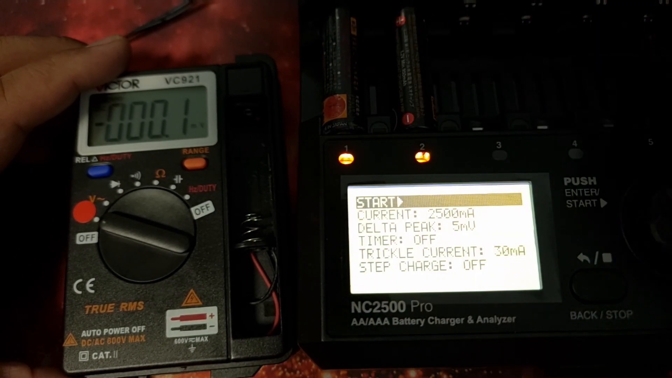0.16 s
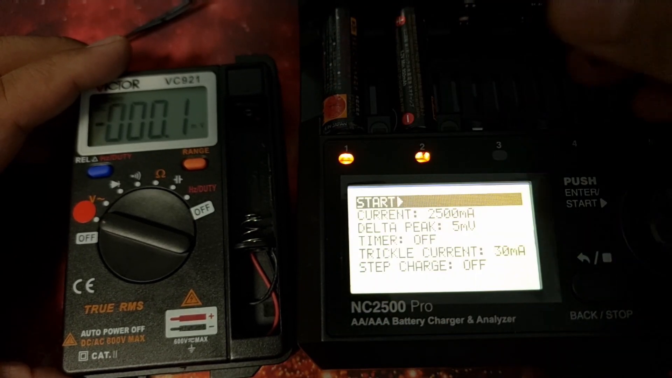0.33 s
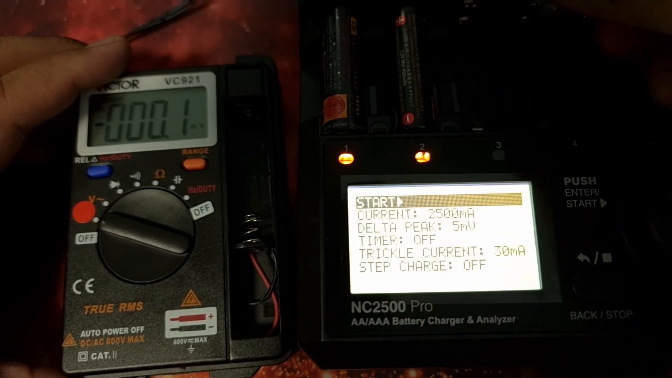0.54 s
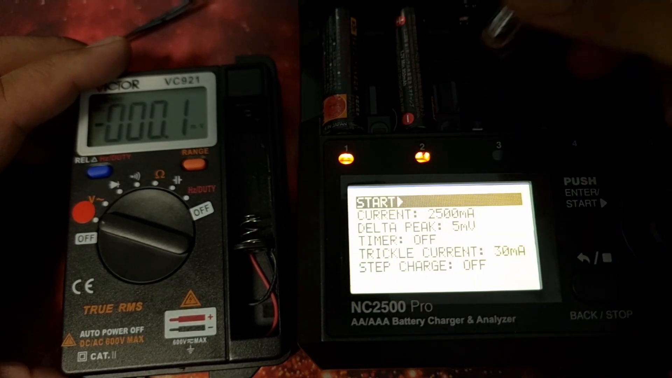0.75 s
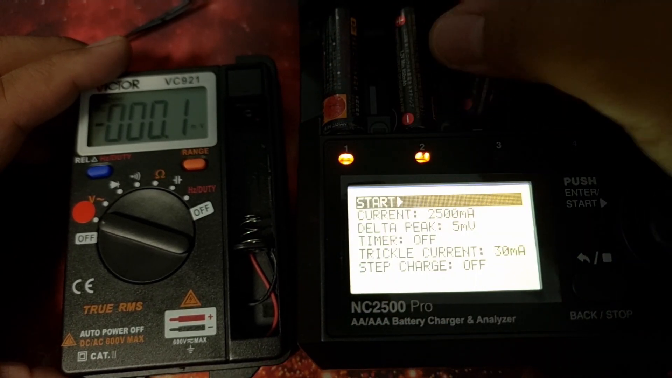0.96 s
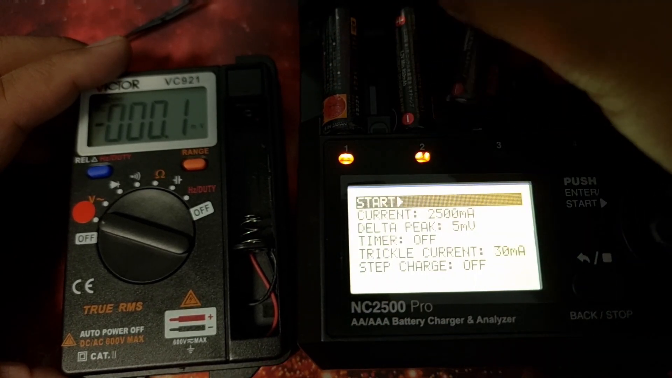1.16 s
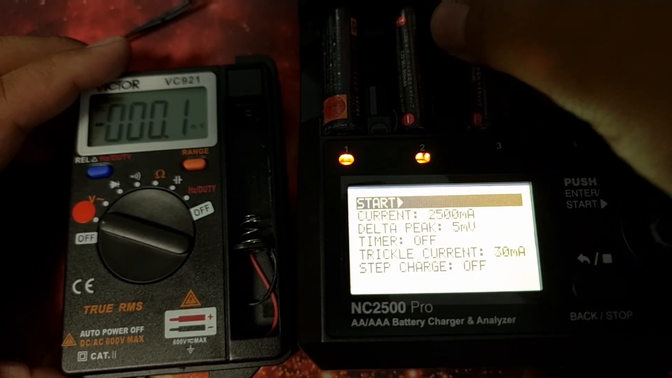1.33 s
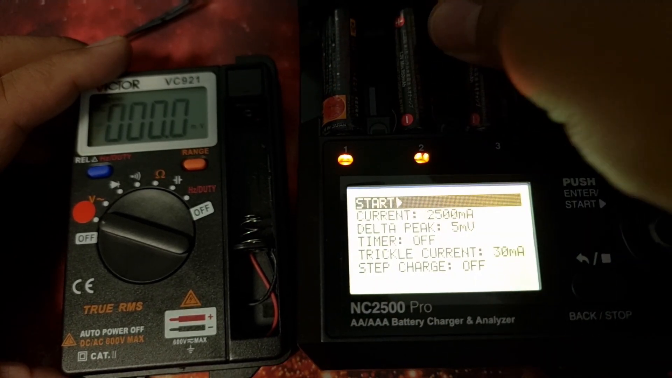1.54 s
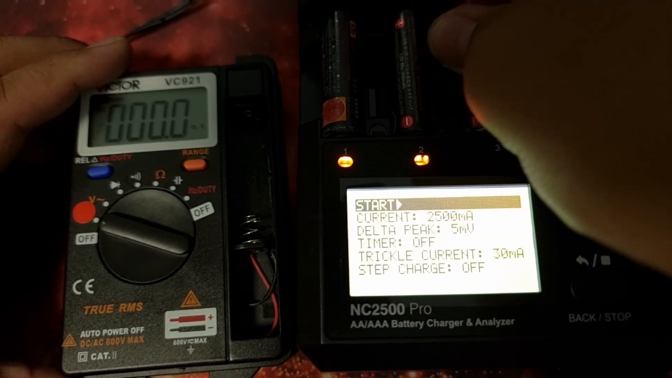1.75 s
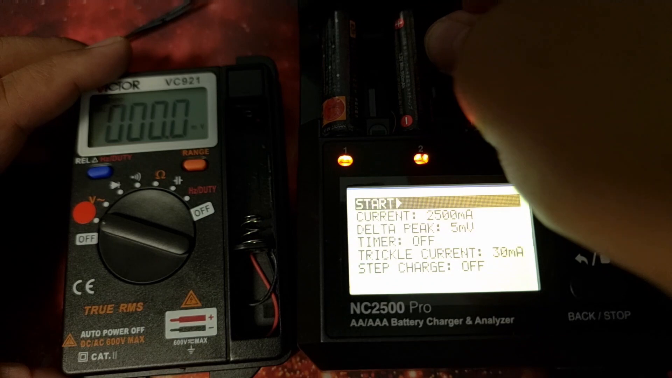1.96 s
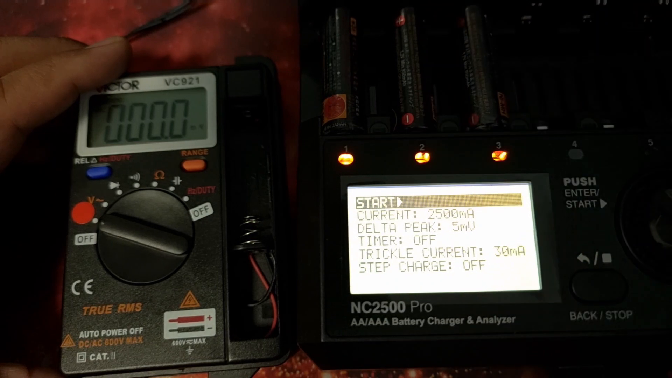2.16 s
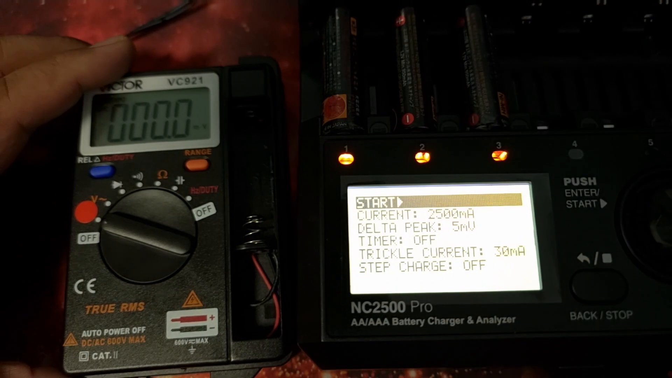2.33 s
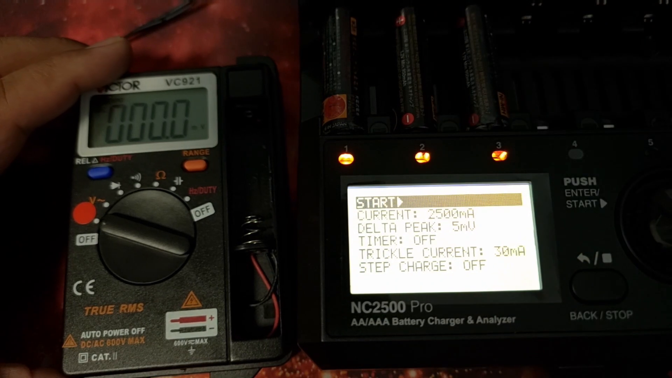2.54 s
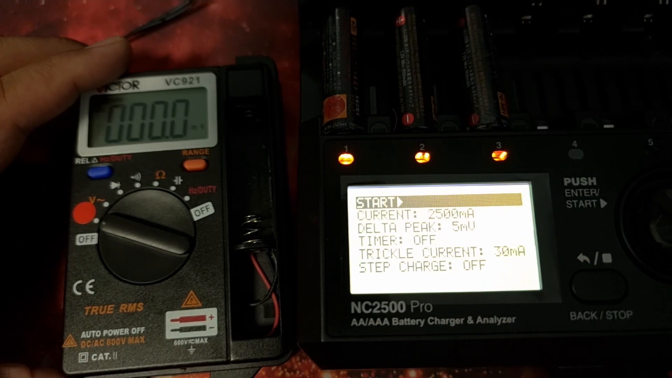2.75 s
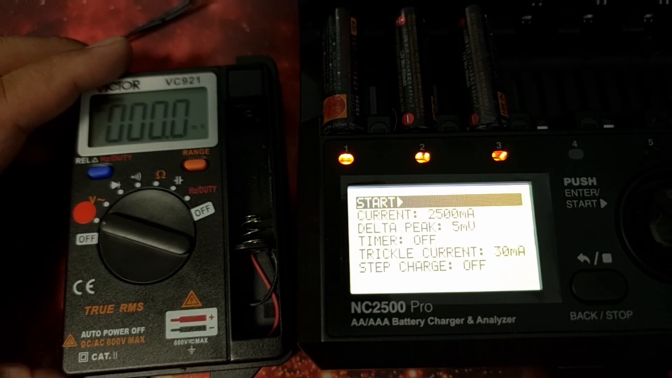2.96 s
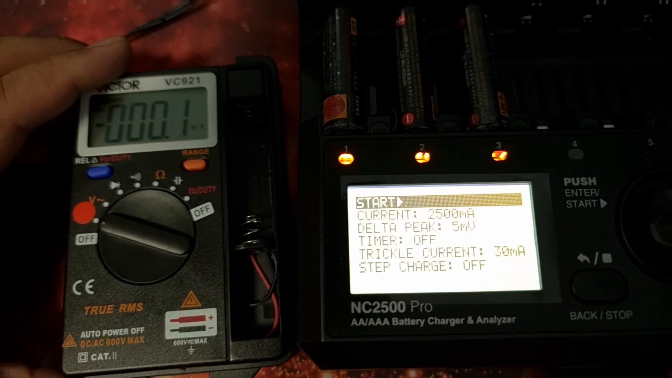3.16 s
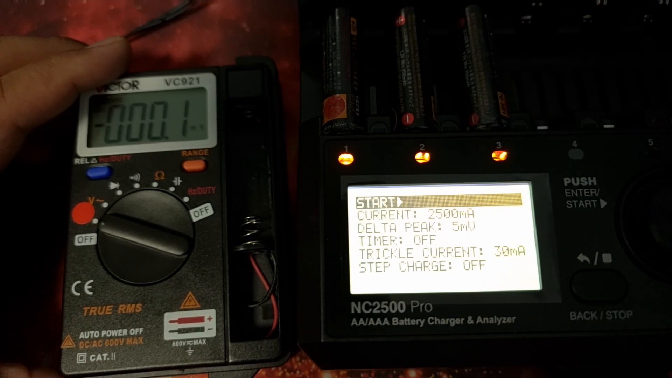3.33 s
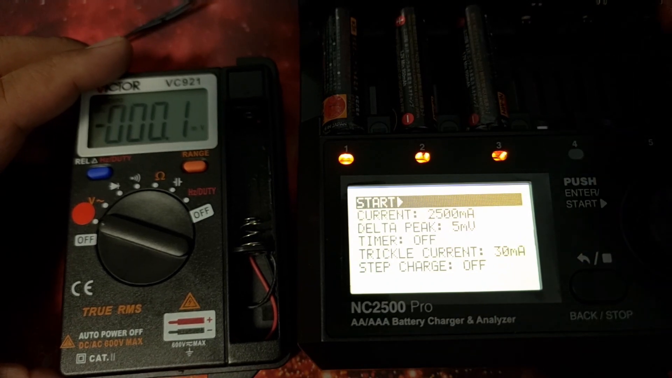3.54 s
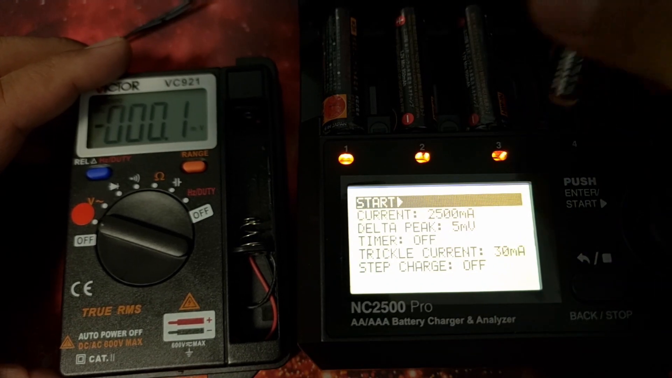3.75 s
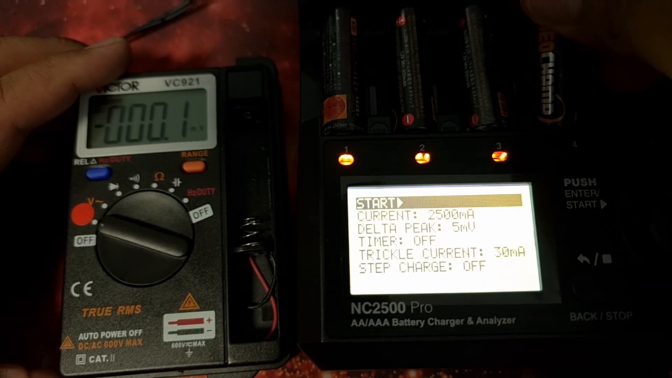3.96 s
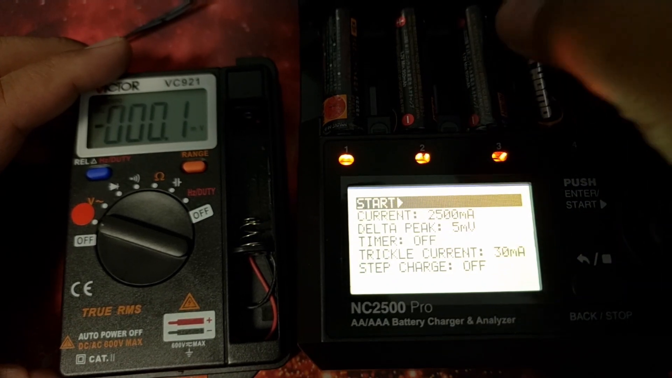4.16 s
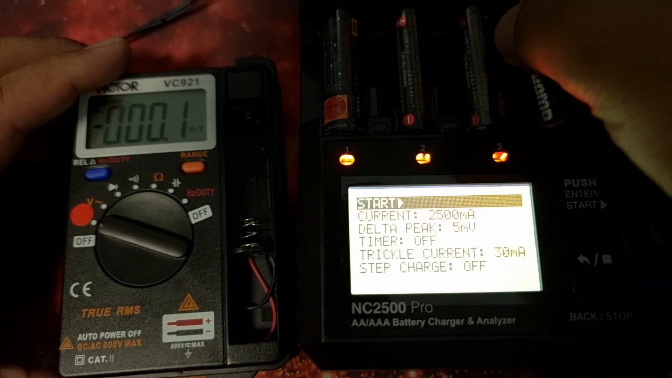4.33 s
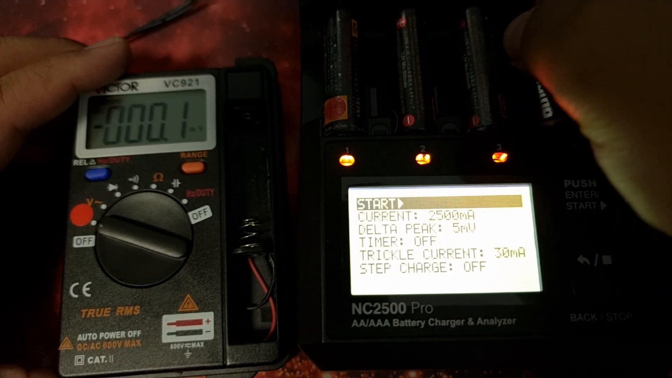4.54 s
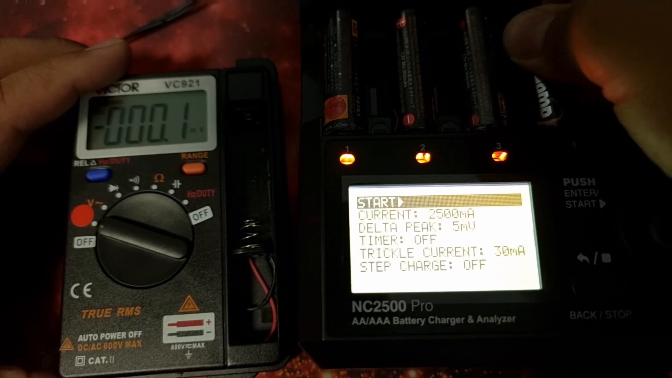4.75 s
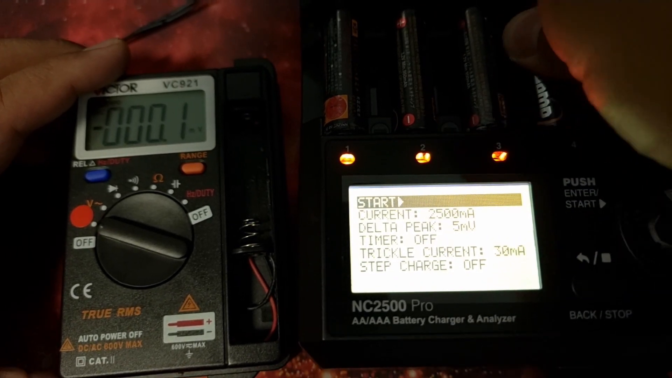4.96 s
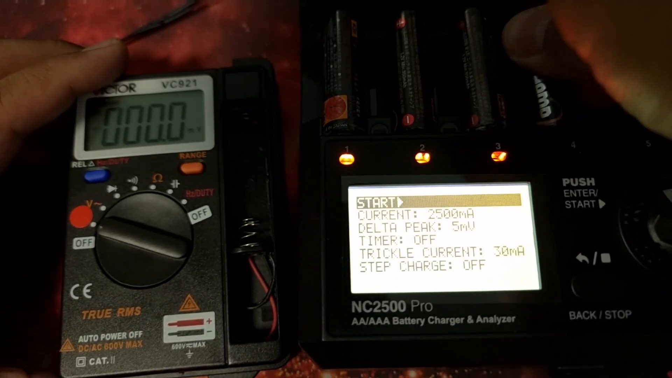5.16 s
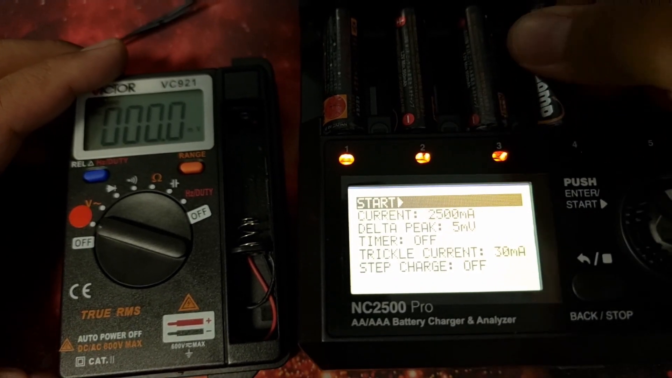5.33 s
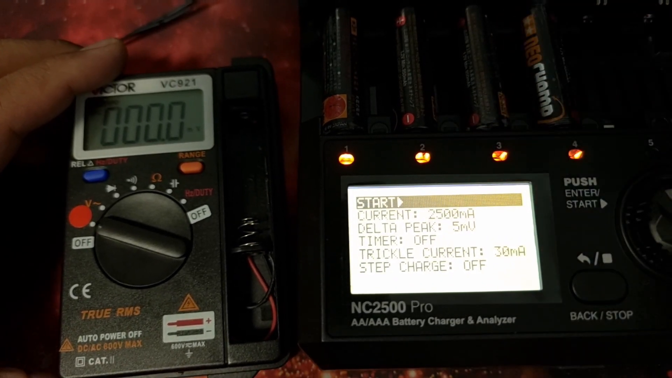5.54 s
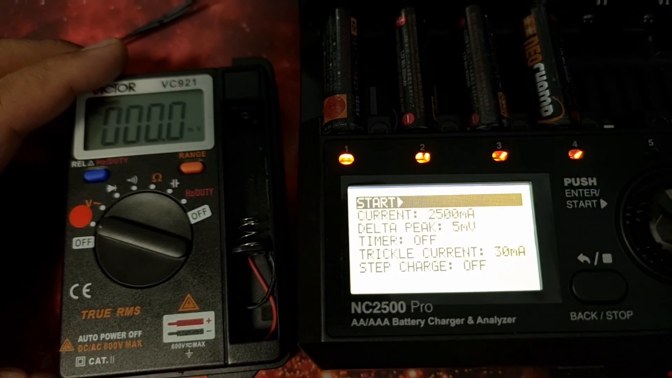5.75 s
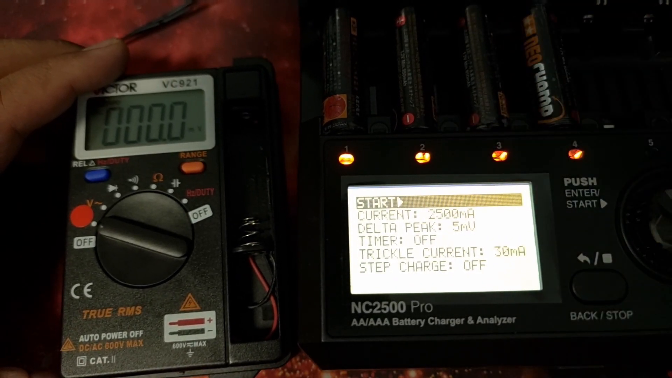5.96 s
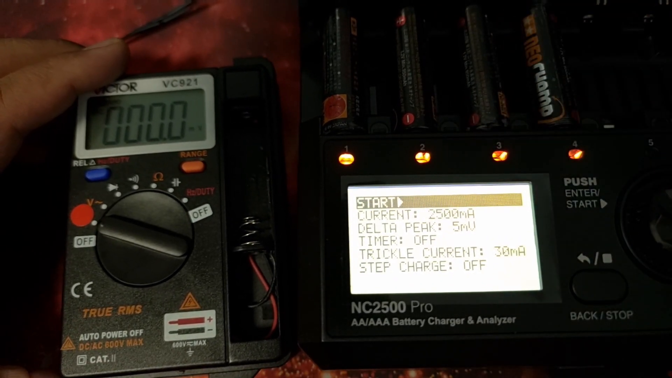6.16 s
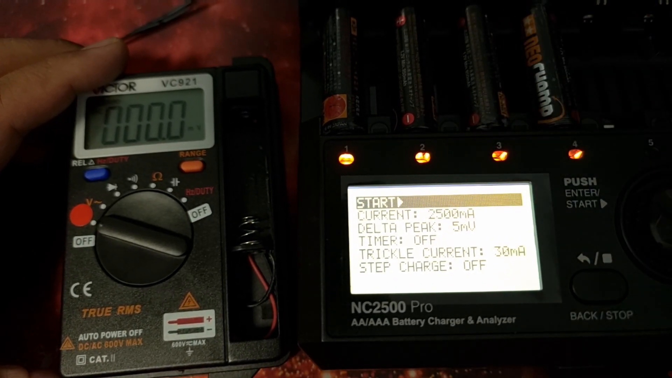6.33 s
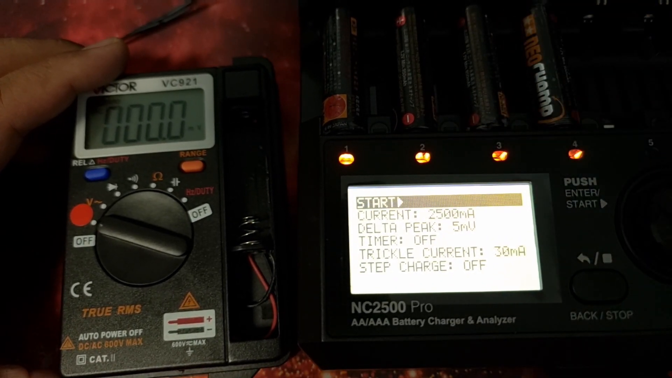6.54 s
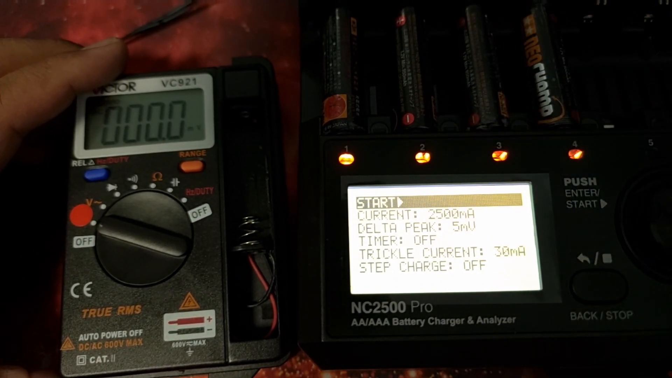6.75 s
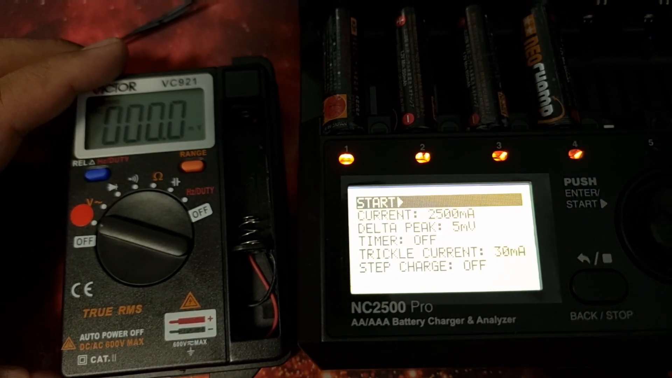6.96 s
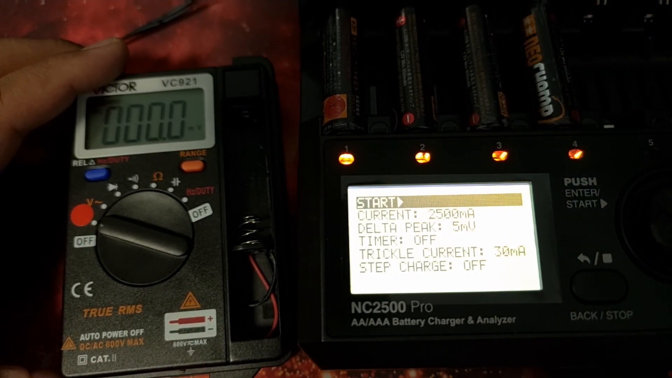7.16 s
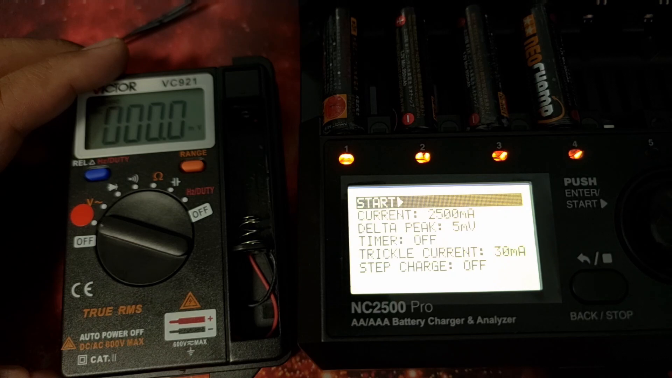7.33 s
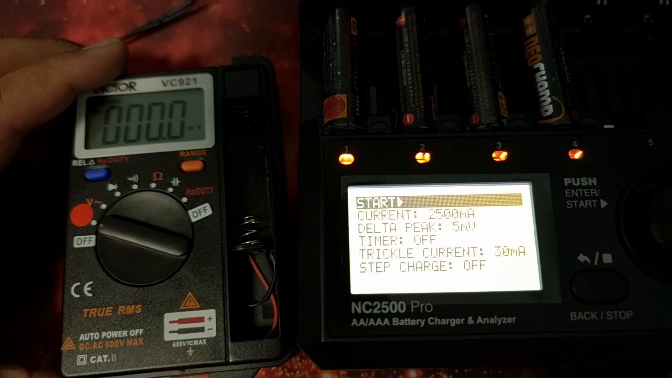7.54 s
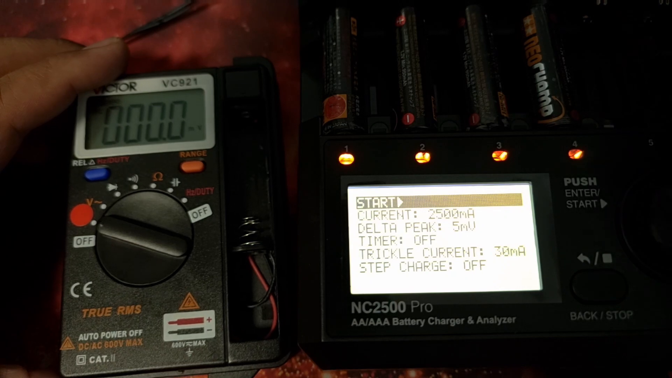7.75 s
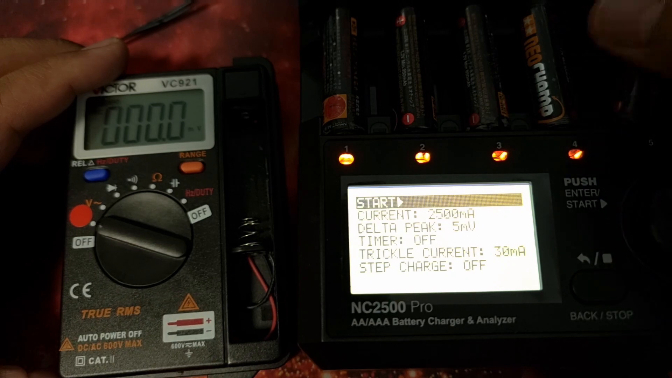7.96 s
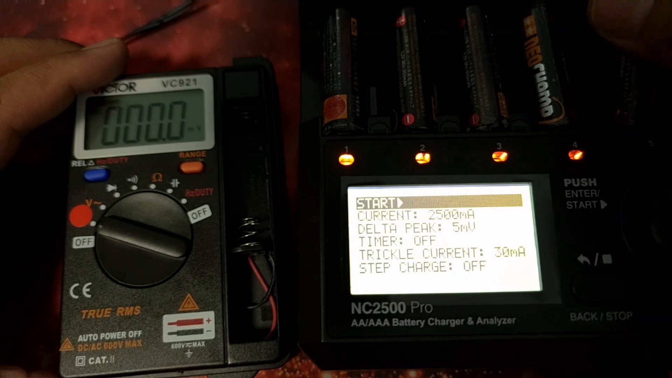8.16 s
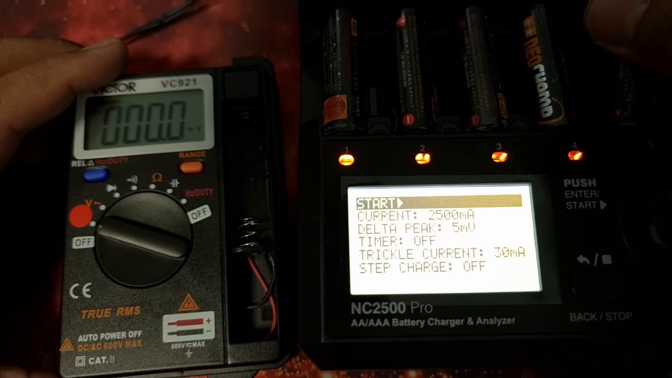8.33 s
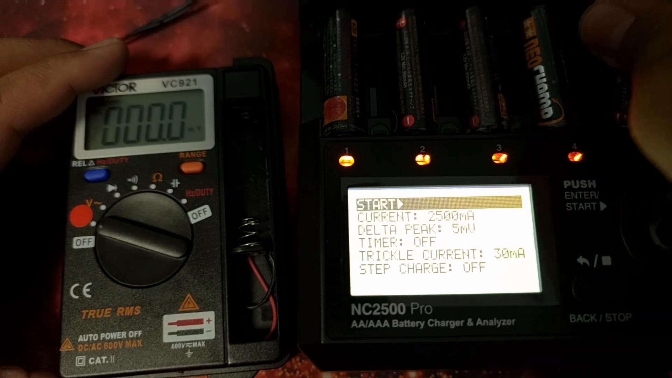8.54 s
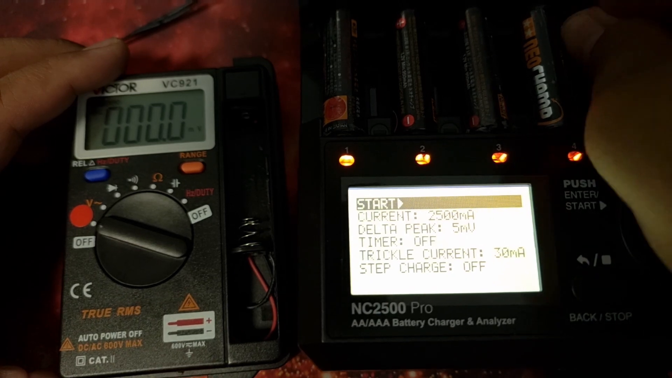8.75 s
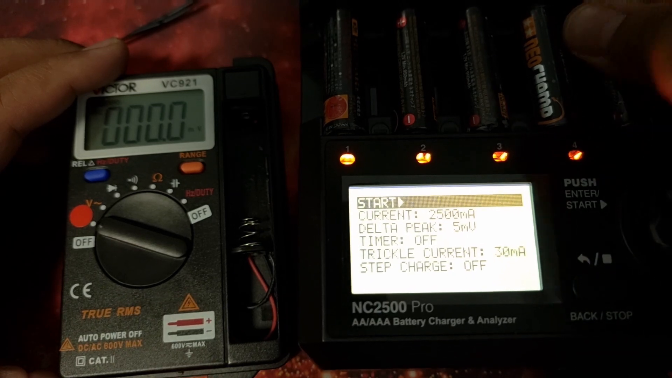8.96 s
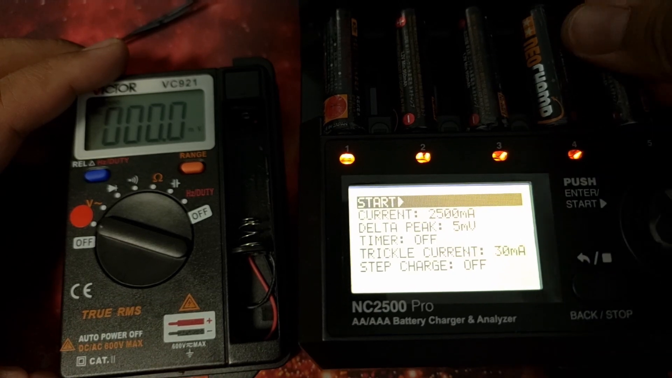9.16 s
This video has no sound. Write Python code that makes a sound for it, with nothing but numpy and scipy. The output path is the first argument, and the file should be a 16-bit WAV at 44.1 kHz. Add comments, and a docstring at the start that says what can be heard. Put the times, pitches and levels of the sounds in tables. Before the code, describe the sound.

A faint fan hum, low rumble and hiss run throughout in a small quiet room. From about 1 second, fingers rustle and a battery taps against a plastic charger, close by and toward the right, snapping into its sprung slot with sharp, hollow clicks and metal ticks at 1.8 to 1.9 seconds. Light scuffs and small ticks follow from 2.5 to 3.3 seconds. More taps start near 3.9 seconds, leading to two loud clacks at 4.3 and 4.5 seconds, now from the left. A battery scrapes along its slot in short slips from 4.8 to 5.3 seconds, with soft table thuds. Fingers rub quietly, and lighter clicks come from the right again around 6.9 and 7.4 seconds, the latter with a dull thump. Small knocks resume at 8 seconds and end in a firm, rattling clack at about 8.8 seconds.

```python
"""A fan hums over low rumble, hiss and a faint whine in a small quiet room. Then fingers rustle and
batteries click into the sprung slots of a plastic charger on a table. Each contact rings the hollow
case, its walls and ribs, with a metal tick from the spring; cells scrape along their slots and the
table thuds. The two microphone ports hear the clicks mostly from the right, briefly from the left."""
import sys
import numpy as np
from scipy import signal
from scipy.fft import rfft, irfft, next_fast_len
from scipy.io import wavfile

SR = 44100
rng = np.random.default_rng(int(sys.argv[2]) if len(sys.argv) > 2 else 0)


def transcribe(signal):
    """Save signal, clipped to [-1, 1], as a 16-bit WAV file at the path in sys.argv[1]."""
    frames = np.atleast_2d(signal).T
    limited = np.clip(frames, -1, 1)
    pcm = np.round(limited * 32767).astype(np.int16)
    wavfile.write(sys.argv[1], SR, pcm)


N = 405719
TIME = np.arange(N) / SR


def from_db(db):
    """Decibels to gain."""
    return 10 ** (np.asarray(db) / 20)


def rms_one(x):
    """Scale to rms 1."""
    return x / np.sqrt(np.mean(x ** 2) + 1e-20)


def energy_one(x):
    """Scale a short sound to the energy of a 6 ms burst of rms 1."""
    return x / np.sqrt(np.sum(x ** 2) / (.006 * SR))


def bin_hz(size):
    """Frequencies of a spectrum's bins, at least 1 Hz."""
    return np.maximum(np.fft.rfftfreq(size, 1 / SR), 1)


def at_hz(table, hz, column=1):
    """Read a column of a table on a log-frequency axis."""
    table = np.array(table)
    return np.interp(np.log(hz), np.log(table[:, 0]), table[:, column])


def fader(points):
    """A gain that glides through points of seconds and dB."""
    return from_db(np.interp(TIME, *np.transpose(points)))


def butter(x, order, hz, kind):
    """Butterworth filter."""
    return signal.sosfilt(signal.butter(order, hz, kind, fs=SR, output="sos"), x)


def colour(x, spectrum):
    """Shape a noise by a spectrum; rms 1."""
    size = x.shape[-1]
    return rms_one(irfft(rfft(x) * from_db(at_hz(spectrum, bin_hz(size))), size))


def ring(push, hz, t60):
    """One mode: a unit click starts a sine of height 1 that falls 60 dB in t60 seconds."""
    radius, angle = from_db(-60 / (t60 * SR)), 2 * np.pi * hz / SR
    return signal.lfilter([0, np.sin(angle)], [1, -2 * radius * np.cos(angle), radius ** 2], push + 1e-18)


def narrow(x, hz, width_hz):
    """One resonance of a given width; rms 1."""
    return rms_one(ring(x, hz, np.log(1000) / (np.pi * width_hz)))


def struck(modes, touches):
    """Ring each mode with its own run of touches and sum them at a set energy."""
    return energy_one(sum(from_db(db) * energy_one(ring(push, hz, t60))
                          for (hz, db, t60), push in zip(modes, touches)))


def drift(rate_hz):
    """A smooth random wander; rms 1."""
    pole = np.exp(-80 * np.pi * rate_hz / SR)
    slow = signal.lfilter([1], [1, -2 * pole, pole ** 2], rng.standard_normal(N // 40 + 2002))[2000:]
    return np.interp(np.arange(N) / 40, np.arange(len(slow)), rms_one(slow))


# Room tone at the microphone. Each row: frequency in Hz, relative level in dB.
RUMBLE_SPECTRUM = [(15, -69.5), (25, -52), (38, -10), (86, -17), (151, -22), (213, -13), (244, -18.5),
                   (344, -16.5), (415, -25.5), (510, -28), (555, -32.5), (1350, -41.5), (1500, -73.5),
                   (1950, -80.5), (3300, -120)]
# How alike the ports hear it. Each row: frequency in Hz, correlation (negative counts as 0).
RUMBLE_LIKENESS = [(60, 0.75), (180, 0.97), (550, 0.67), (1650, -0.48), (4970, -0.06), (15000, 0.48)]

def rumble():
    """Room rumble, nearly alike at both ports in the bass; the lowest part comes in lumps."""
    alike = np.clip(at_hz(RUMBLE_LIKENESS, bin_hz(N)), 0, 1)
    mid, side = rfft(colour(rng.standard_normal((2, N)), RUMBLE_SPECTRUM))
    air = irfft(np.sqrt(1 + alike) * mid + np.sqrt(1 - alike) * side * [[1], [-1]], N)
    lumps = butter(air, 2, 90, "low") * (from_db(3.5 * drift(1.5)) - 1)
    return from_db(-53) * rms_one(air + lumps)


# The steady noise floor. Each row: frequency in Hz, relative level in dB.
HISS_SPECTRUM = [(710, -37), (1200, -27), (1370, -9.5), (1870, -16.5), (2690, -10.5), (2900, -16.5),
                 (3480, -11.5), (7590, -24.5), (11000, -34.5), (14300, -31.5), (22000, -120)]
# The treble hiss on top. Each row: time in seconds, level in dB.
TREBLE_HISS_LEVEL = [(0, -68.5), (.9, -73.5), (2.2, -65.5), (2.6, -72.5), (3.803, -70.5), (4.999, -75),
                     (6, -74.5), (6.998, -71), (8.001, -75), (9.2, -70)]

def hiss():
    """Unrelated noise in each port; its treble swells and sinks."""
    steady = colour(rng.standard_normal((2, N)), HISS_SPECTRUM)
    treble = rms_one(butter(rng.standard_normal((2, N)), 5, 11800, "high"))
    return from_db(-71.5) * steady + fader(TREBLE_HISS_LEVEL) * treble


# A faint whine in the room. Each row: pitch in Hz, width in Hz, relative level in dB.
WHINE_BANDS = [(2217, 170, -4.5), (3504, 74, -12.5), (4160, 200, -11.5)]
# Its swells. Each row: time in seconds, gain in dB.
WHINE_SWELLS = [(0, -62), (0.4, -86), (1.9, -88.5), (2.121, -59.5), (2.479, -61.5), (2.653, -76),
                (7.3, -80), (7.7, -75), (8.101, -83.5), (9.2, -74.5)]

def whine():
    """Breathy noise in three narrow resonances that swells and sinks."""
    noise = rng.standard_normal(N)
    bands = sum(from_db(db) * narrow(noise, hz, width_hz) for hz, width_hz, db in WHINE_BANDS)
    return fader(WHINE_SWELLS) * bands


def fan(hz=216):
    """The fan's hum: a slightly wavering tone with a narrow band of noise around it."""
    tone = np.sin(2 * np.pi * hz * TIME + 1.5 * drift(0.75))
    flutter = from_db(-8.5) * narrow(rng.standard_normal(N), hz, width_hz=14)
    return from_db(-55.5) * rms_one(tone + flutter)


# Skin and cloth rubbing at the charger. Each row: frequency in Hz, relative level in dB.
RUSTLE_SPECTRUM = [(1000, -73.5), (1500, -77.5), (2300, -42), (3100, -17.5), (4400, 13.5), (5800, 14),
                   (7600, 9), (8400, 2), (11000, 1), (12500, 2.5), (16000, -5.5)]
# Hollows that the rubbing excites. Each row: pitch in Hz, width in Hz, relative level in dB.
RUB_HOLLOWS = [(1804, 26, -25), (3018, 100, -18.5), (4030, 450, -6.5), (6240, 960, -37.5)]
# Fingers and sleeve. Each row: start in seconds, length in seconds, level in dB,
# dull rub against that level in dB, pitch of the main colour in Hz.
HAND_SCUFFS = [(0.25, 0.087, -70.5, -9, 6840), (0.561, 0.11, -59.5, -21, 2400),
               (1.18, 0.016, -43, -1, 5160), (1.324, 0.024, -39, -7.5, 5775), (1.776, 0.27, -38.5, 0, 4050),
               (1.924, 0.12, -40.5, -16, 3900), (2.015, 0.11, -50.5, -8, 3640),
               (2.155, 0.11, -59.5, -28, 4100), (2.56, 0.14, -62, -3, 2330), (2.751, 0.1, -49, -47.5, 3300),
               (2.777, 0.02, -43, -46, 7540), (2.844, 0.014, -71, -37, 5500),
               (2.938, 0.038, -55.5, -33, 5600), (3.032, 0.12, -46.5, -40, 3470),
               (3.253, 0.0095, -32, -20, 5630), (3.428, 0.051, -69, -32, 5000),
               (3.585, 0.17, -68, -7.5, 2960), (5.326, 0.075, -53.5, -9, 2750),
               (5.438, 0.068, -53.5, -1, 3660), (5.579, 0.097, -67, -2, 1890),
               (6.276, 0.04, -50.5, -35, 2750), (6.344, 0.17, -64.5, -38, 2620),
               (6.495, 0.096, -54.5, -19, 2820), (6.571, 0.079, -55, -7, 2940),
               (6.704, 0.07, -53.5, -37, 2920), (6.851, 0.076, -55, -4, 3000),
               (6.986, 0.061, -48, -40, 3220), (7.086, 0.055, -44.5, -18, 3600),
               (7.487, 0.015, -44, -28, 3650), (7.613, 0.068, -68.5, -4.5, 3500),
               (8.553, 0.091, -62, 12.5, 2950), (8.943, 0.021, -72.5, 34.5, 2600),
               (9.058, 0.098, -64, 9.5, 4100)]

def hand(grains_per_s=3500, attack_s=0.014, release_s=0.0071, swell_db=14.5):
    """Fine friction grains of skin and cloth over a duller rub; each scuff swells and falls."""
    size = SR // 2
    total = N + size
    t, out = np.arange(size) / SR, np.zeros(total)
    grains = (rng.random(total) < grains_per_s / SR) * rng.standard_normal(total)
    grains *= from_db(2 * np.minimum(rng.exponential(1, total), 3))   # a few grains stand out
    grains *= np.resize(from_db(3 * drift(60)), total)   # and they come in clumps
    rub = rms_one(butter(grains, 2, [600, 2000], "band"))
    hollows = sum(from_db(db) * narrow(grains, hz, width_hz) for hz, width_hz, db in RUB_HOLLOWS)
    rustle = rms_one(colour(grains, RUSTLE_SPECTRUM) + hollows)
    chance_pitches = 2400 * 3.2 ** rng.random((len(HAND_SCUFFS), 2))
    for (start, length, db, dull_db, main_hz), pitches in zip(HAND_SCUFFS, chance_pitches):
        span = slice(round(start * SR), round(start * SR) + size)
        envelope = np.clip(t / attack_s, 0, 1) ** 2 * np.exp(-np.maximum(t - length, 0) / release_s)
        envelope *= from_db(swell_db * (np.sin(np.pi * np.clip(t / length, 0, 1)) - 1))
        tint = from_db(-5) * narrow(grains[span], main_hz, .16 * main_hz)
        tint += from_db(-9) * sum(narrow(grains[span], hz, .14 * hz) for hz in pitches)
        out[span] += from_db(db) * envelope * (rustle[span] + tint + from_db(dull_db) * rub[span])
    return out[:N]


# The table top's low and upper modes. Each row: pitch in Hz, relative level in dB, t60 in seconds.
TABLE_LOW_MODES = [(45.4, -4.5, 0.21), (62.75, 0, 0.93), (83, 1.5, 0.51)]
TABLE_UPPER_MODES = [(188.2, 0.5, 0.29), (254, 7, 0.1), (332, 3.5, 0.21), (389, 3, 0.11)]
# Pushes into the table under the charger. Each row: start in seconds, then gains in dB
# for the low modes, the middle mode and the upper modes.
TABLE_PUSHES = [(1.762, -32, -31, -39), (1.909, -26.5, -22, -38), (2.524, -46.5, -33.5, -30.5),
                (2.726, -56.5, -34.5, -41), (2.79, -56, -44, -44), (3.033, -47, -30, -46),
                (3.09, -36, -45, -26), (3.131, -51, -42, -27), (3.191, -52, -22.5, -40.5),
                (4.263, -38.5, -52, -62), (4.528, -33, -32.5, -54), (4.808, -62, -20.5, -41),
                (4.912, -51, -23.5, -67), (4.955, -48, -28, -40), (5.076, -37, -18, -34),
                (5.101, -45, -35, -40), (5.173, -43, -16, -36), (5.247, -53, -20, -34.5),
                (6.261, -41, -33.5, -42), (6.445, -43, -39.5, -41), (6.53, -60, -36, -71),
                (6.89, -41, -19.5, -40), (6.905, -47, -47, -30), (6.931, -44, -20.5, -35),
                (7.128, -52, -42, -33.5), (7.322, -60.5, -25, -38), (7.384, -40, -8.5, -23.5),
                (8.621, -42.5, -29.5, -56.5), (8.782, -35.5, -29, -35), (8.869, -54.5, -38, -59),
                (9.09, -42.5, -38, -86), (9.179, -53, -30, -62)]

def table_thuds(middle_hz=113, twin_hz=117.8, middle_t60=.3, build_s=0.01):
    """Soft pushes set the table top swinging; its middle mode builds up and beats with a weaker twin."""
    size = SR // 2
    t, out = np.arange(size) / SR, np.zeros(N + SR)
    push = t * np.exp(-t / 0.00115)
    push /= push.sum()
    scatters_db = rng.standard_normal((len(TABLE_PUSHES), 8))
    for (start, low_db, middle_db, upper_db), scatter_db in zip(TABLE_PUSHES, scatters_db):
        modes = [(hz, low_db + db, t60) for hz, db, t60 in TABLE_LOW_MODES]
        modes += [(hz, upper_db + db, t60) for hz, db, t60 in TABLE_UPPER_MODES]
        swing = sum(from_db(db + scatter_db[k]) * (-1) ** k * ring(push, hz, t60)
                    for k, (hz, db, t60) in enumerate(modes))
        middle = from_db(middle_db) * ring(push, middle_hz, middle_t60)
        twin = from_db(middle_db - 17.5 + 2.7 * scatter_db[-1]) * ring(push, twin_hz, middle_t60)
        out[round(start * SR):][:size] += swing + (middle + twin) * (1 - np.exp(-t / build_s))
    return butter(out[:N], 3, [32, 420], "band")


# The battery slot. Each row: pitch in Hz, relative level in dB, t60 in seconds.
SLOT_MODES = [(727, 0, .02), (867, -3, .018), (1080, -3, .016), (1490, 0, .022), (1700, -6, .01),
              (2540, -2, .014), (3030, -3, .012), (3290, -5, .01), (3600, -7, .01), (4150, -3, .016),
              (5300, -10, .006)]
# A cell pressed along it. Each row: start in seconds, level in dB, gain of the upper modes in dB.
CELL_SLIPS = [(4.811, -43.5, -6), (4.821, -41, -13), (4.848, -44, -6.5), (4.891, -53, -13),
              (4.904, -46, -10), (4.918, -46.5, -1), (4.932, -39.5, -5.5), (4.959, -40.5, 2.5),
              (5.066, -41, 6), (5.072, -34.5, 0), (5.084, -35, -6), (5.095, -38.5, -1), (5.106, -45, -11),
              (5.1665, -35, -1), (5.184, -37, -3.5), (5.2455, -33, 2), (5.256, -53, -2),
              (5.3035, -42.5, -18)]

def cell_slips(scratch_s=.0012, upper_above_hz=2000):
    """Each slip of a cell is a short scratch that rings the modes of the slot."""
    size = 4096
    t, out = np.arange(size) / SR, np.zeros(N + size)
    noises = rng.standard_normal((len(CELL_SLIPS), len(SLOT_MODES), size))
    for (start, level_db, upper_db), noise in zip(CELL_SLIPS, noises):
        modes = [(hz, db + upper_db * (hz > upper_above_hz), t60) for hz, db, t60 in SLOT_MODES]
        scratch = noise * t * np.exp(-t / scratch_s)
        out[round(start * SR):][:size] += from_db(level_db) * struck(modes, scratch)
    return out[:N]


def case_hollow(hz, touches, case_hz=874.5, t60=0.055):
    """The hollow case knocks and rings; a faint tail lasts only near the case's own pitch."""
    main, overtone = (hz, 0, t60), (hz * 1.3, -8, t60)
    knock, neighbour = (hz, 3, .013), (hz * 0.99, -3, t60)
    tail = (hz, -13.5 - 58.5 * abs(np.log2(hz / case_hz)), 0.42)
    return struck([main, overtone, knock, neighbour, tail], touches)


# The charger's thin plastic ribs. Each row: pitch in Hz, relative level in dB, t60 in seconds.
RIB_MODES = [(2300, 0, .011), (2550, 0, .011), (2900, 0, .01), (3200, -1, .009), (3600, -2, .008),
             (4050, -3, .006), (4600, -3, .005), (5200, -4, .005), (5800, -5, .005), (6500, -7, .004),
             (7300, -10, .004)]

def case_ribs(brightest_hz, touches, ring_cycles=70):
    """Ribs weaken away from the brightest pitch; the one nearest the contact and its neighbour ring on."""
    modes = []
    for hz, db, t60 in RIB_MODES:
        octaves = np.log2(hz / brightest_hz)
        loss_db_per_octave = 13.5 if octaves > 0 else 14
        modes.append((hz, db - loss_db_per_octave * abs(octaves), t60))
    nearest_db = 6 if brightest_hz > 5000 else -6   # a ping this high is a spring blade, and louder
    t60 = ring_cycles / brightest_hz
    modes += [(brightest_hz, nearest_db, t60), (brightest_hz * 1.25, -12, t60)]
    return struck(modes, touches)


# The metal tick in the slot. Each row: frequency in Hz, relative level in dB.
TICK_SPECTRUM = [(6500, 9), (7500, -6.5), (9000, -8.5), (11000, -10.5), (13000, -5), (16000, -1.5)]

def spring_tick(t, tick_noise, rattle_noise, uneven, touch_s=.0011, rattle_t60=.3):
    """One short, bright touch of metal, after which the spring rattles on."""
    tick = butter(colour(tick_noise, TICK_SPECTRUM), 4, 6500, "high") * t * np.exp(-t / touch_s)
    grains = rattle_noise * from_db(3 * uneven) * t / (t + 0.0018) * from_db(-60 * t / rattle_t60)
    rattle = butter(colour(grains, TICK_SPECTRUM), 4, 6500, "high")
    return energy_one(tick) + from_db(-10.5) * energy_one(rattle)


# The walls of the case. Each row: pitch in Hz, relative level in dB, t60 in seconds.
WALL_MODES = [(1090, 9, 0.00095), (1395.5, 5, 0.014), (1440, -3.5, 0.029), (1810, 3, 0.0019),
              (1880, -9.5, 0.03), (1840, -3, 0.011)]
# Batteries clicking into the charger, mostly heard from the right, briefly from the left.
# Each row: start in seconds, rib level in dB, brightest rib in Hz, hollow level in dB,
# hollow pitch in Hz, wall level in dB, tick level in dB.
BATTERY_CONTACTS = [(1.0392, -45, 2450, -30, 842, -37, -72), (1.0689, -29, 2160, -20, 960, -25.5, -56),
                    (1.1916, -43, 3660, -41.5, 772, -68, -76),
                    (1.3375, -41.5, 4750, -58.5, 1170, -36, -27.5),
                    (1.354, -39, 2580, -25.5, 832, -53, -48), (1.502, -42, 2340, -31, 913, -31, -172),
                    (1.7565, -44, 5540, -18.5, 788, -14.5, -15),
                    (1.769, -22.5, 3500, -24.5, 870, -22.5, -38), (1.785, -28.5, 3560, -29, 854, -29, -55),
                    (1.9089, -13.5, 3660, -16, 796, -31, -20.5), (1.921, -26, 3000, -31, 860, -47, -45),
                    (2.5217, -43.5, 3600, -41.5, 1013, -62, -54), (2.742, -55, 3150, -46, 1080, -50, -80),
                    (3.0112, -39.5, 2810, -49.5, 720, -77, -44.5),
                    (3.106, -44.5, 2620, -44, 1040, -54, -55), (3.1848, -74, 3120, -51, 800, -46, -72),
                    (3.257, -43, 3470, -47, 1633, -67, -56), (3.2643, -47.5, 5520, -73, 732, -63, -46.5),
                    (3.8862, -61, 2590, -24.5, 865, -26.5, -74),
                    (3.901, -43.5, 3970, -29, 1190, -31, -60.5), (3.922, -53.5, 4560, -59, 860, -57, -44),
                    (4.0763, -41, 2140, -25, 875, -35.5, -80), (4.143, -63, 4400, -63, 890, -53, -58.5),
                    (4.2626, -12, 2520, -14.5, 875, -25, -32), (4.2765, -43, 2630, -22, 928, -45, -41),
                    (4.298, -35.5, 2440, -28, 876, -31, -44),
                    (4.5238, -17.5, 3050, -16.5, 894, -18.5, -20.5),
                    (4.538, -24.5, 2560, -17, 882, -18.5, -39.5), (4.564, -42, 2490, -22.5, 924, -23, -31),
                    (4.7014, -52, 3140, -36, 900, -52, -63.5), (4.9638, -58.5, 5550, -49, 880, -56, -36),
                    (6.2633, -51, 4620, -62, 790, -57.5, -48.5), (6.431, -62, 3570, -72, 780, -68, -60.5),
                    (6.895, -51, 2430, -37, 786, -32, -53), (6.9046, -26.5, 2460, -35, 925, -22, -41),
                    (7.3192, -38.5, 3100, -40.5, 1070, -35, -43),
                    (7.3799, -30, 2250, -37, 868, -26.5, -37.5),
                    (7.499, -47.5, 5255, -70.5, 830, -69, -59.5),
                    (8.035, -47.5, 3035, -25.5, 829, -25.5, -56), (8.0617, -45, 3780, -63, 770, -43.5, -38),
                    (8.2135, -60, 2460, -24.5, 840, -32, -71), (8.237, -37, 5890, -58, 820, -61, -46.5),
                    (8.3616, -45.5, 2770, -27.5, 858, -37.5, -76.5),
                    (8.631, -37.5, 3970, -30.5, 852, -26.5, -75.5),
                    (8.7925, -22, 2870, -13.5, 777, -11, -19.5), (8.807, -23, 2950, -30, 764, -27, -56),
                    (8.828, -35, 2560, -23.5, 800, -26, -45)]

def battery_contacts(chatter_s=0.0034):
    """A chatter of touches rings the case while the spring ticks; returns direct sound and room feed."""
    size = 8192
    t, out = np.arange(size) / SR, np.zeros((2, N + size))
    plastic_sends, tick_sends = from_db([[0], [-5]]), from_db([[0], [-11]])   # direct, to the room
    noises = rng.standard_normal((len(BATTERY_CONTACTS), 27, size))
    for contact, noise in zip(BATTERY_CONTACTS, noises):
        start, rib_db, rib_hz, hollow_db, hollow_hz, wall_db, tick_db = contact
        uneven = noise[0]   # makes a few touches stand out
        touches = noise * np.exp(-t / chatter_s) * (1 - np.exp(-t / 0.00048)) * (1 + np.abs(uneven))
        hollow = from_db(hollow_db) * case_hollow(hollow_hz, touches[1:6])
        walls = from_db(wall_db) * struck(WALL_MODES, touches[6:12])
        ribs = from_db(rib_db) * case_ribs(rib_hz, touches[12:25])
        tick = from_db(tick_db) * spring_tick(t, noise[26], noise[25], uneven)
        plastic = butter(hollow + walls, 2, 2600, "low") + butter(ribs, 3, [1000, 7500], "band")
        plastic = butter(plastic, 6, 7800, "low")   # plastic gives little high treble
        out[:, round(start * SR):][:, :size] += plastic * plastic_sends + tick * tick_sends
    return butter(out[:, :N], 5, 660, "high")   # a small case radiates no bass


# The small room around the table. Each row: frequency in Hz, t60 in seconds, left-right correlation.
ROOM_DECAY = [(187.4, 0.79, 0.47), (800, 0.21, 0.51), (2500, 0.36, 0.13), (6454, 0.27, 0.5),
              (13430, 0.082, 0.6)]

def room(x, onset_s=0.0035):
    """Reflections merge into a noise tail that dies octave by octave, partly alike in both ports."""
    size = SR // 2
    t, hz = np.arange(size) / SR, bin_hz(size)
    white = rfft(rng.standard_normal((3, size)))
    alike = at_hz(ROOM_DECAY, hz, column=2)
    spectrum = np.sqrt(alike) * white[0] + np.sqrt(1 - alike) * white[1:]
    tail = np.zeros((2, size))
    for centre_hz in 250 * 2. ** np.arange(7):
        band = irfft(spectrum * np.clip(1 - np.abs(np.log2(hz / centre_hz)), 0, 1), size)
        tail += band * from_db(-60 * t / at_hz(ROOM_DECAY, centre_hz))
    tail *= np.clip(t / onset_s, 0, 1) ** 3
    tail /= np.sqrt(np.sum(tail ** 2, axis=1, keepdims=True))
    return signal.fftconvolve(x[None], tail, axes=1)[:, :N]


# The left microphone port against the right. Each row: frequency in Hz,
# lag in seconds before scaling by lag_share, level in dB.
LEFT_PORT_RESPONSE = [(486, 0.000088, 5.5), (940, 0.00011, -2.5), (1470, 0.00045, 1.5), (2820, .00038, 2),
                      (4470, 0.00038, 5.5), (8000, 0.00044, -11), (11070, .00038, -7)]

def ports(x, lag_share, bounce_s=.00068):
    """The left port hears later or earlier, shaded by the recorder's body, and once more off the table."""
    size = next_fast_len(N + 128)
    hz = bin_hz(size)
    shade = from_db(at_hz(LEFT_PORT_RESPONSE, hz, column=2))
    delay = np.exp(-2j * np.pi * hz * lag_share * at_hz(LEFT_PORT_RESPONSE, hz))
    bounce = 1 + from_db(-10.5) * np.exp(-2j * np.pi * hz * bounce_s)
    left = irfft(rfft(x, size) * shade * delay * bounce, size)[:N]
    return np.array([left, x])


def scene():
    """Most contacts reach the right port first; table and fan reach both nearly alike."""
    clicks, clicks_to_room = battery_contacts()
    rustle_and_whine = hand() + whine()
    slips = cell_slips()
    low = table_thuds() + fan()
    low = np.array([np.roll(low, 8), low]) * from_db([[.4], [-.4]])   # left: 8 samples later, a bit louder
    dry_mix = clicks + slips + rustle_and_whine
    from_left = (TIME > 4.24) & (TIME < 5.32)   # this stretch reaches the left port first
    direct = ports(dry_mix * ~from_left, lag_share=0.928) + ports(dry_mix * from_left, lag_share=-1.3)
    reverb = room(clicks_to_room + from_db(-5) * slips + from_db(-6) * rustle_and_whine)
    return direct + reverb + low + rumble() + hiss()


def record(dry):
    """The recorder rounds the loudest peaks and cuts the highest treble."""
    ceiling, cutoff_hz = .95, 15800
    rounded = ceiling * dry / (ceiling ** 4 + dry ** 4) ** .25
    return signal.sosfilt(signal.ellip(10, .5, 60, cutoff_hz, fs=SR, output="sos"), rounded)


dry = scene()
out = record(dry)
transcribe(out)
```